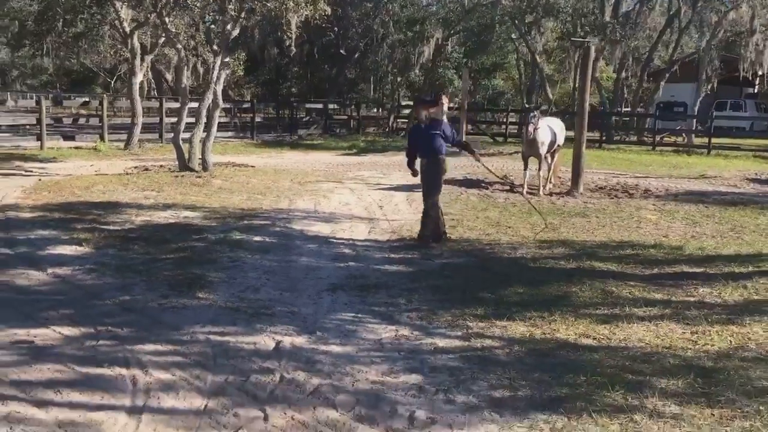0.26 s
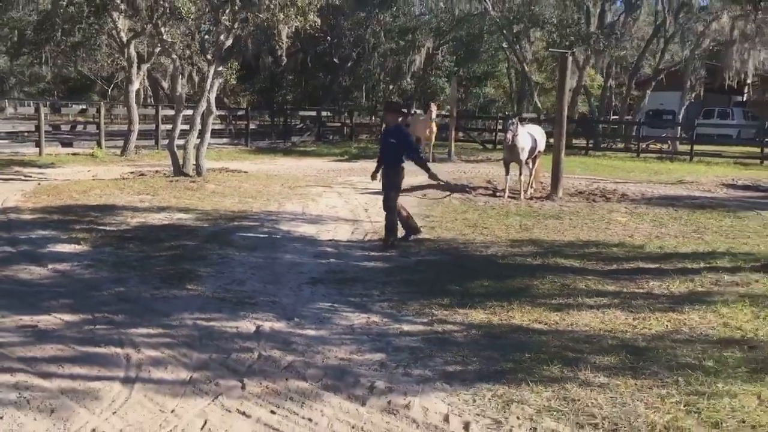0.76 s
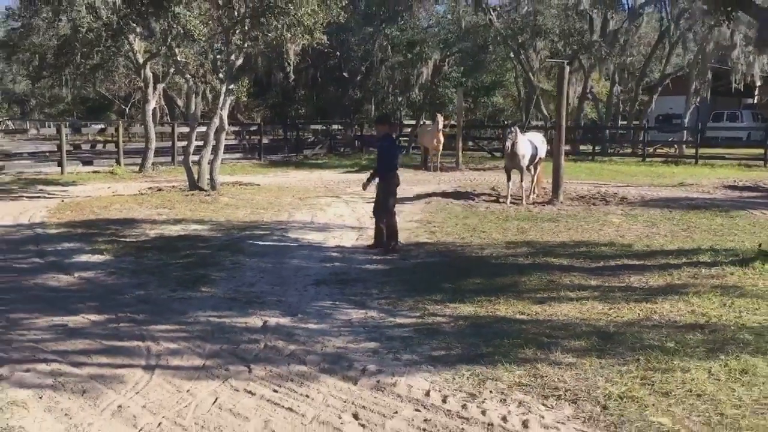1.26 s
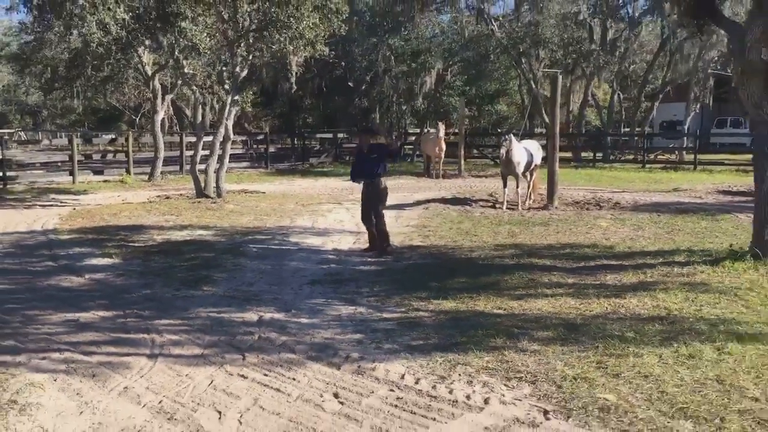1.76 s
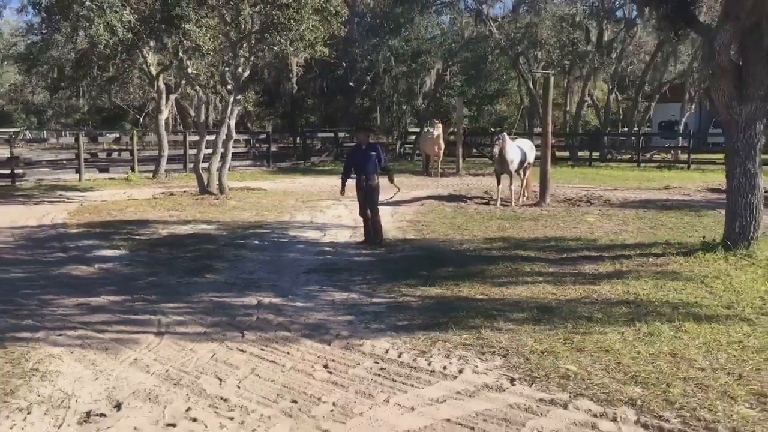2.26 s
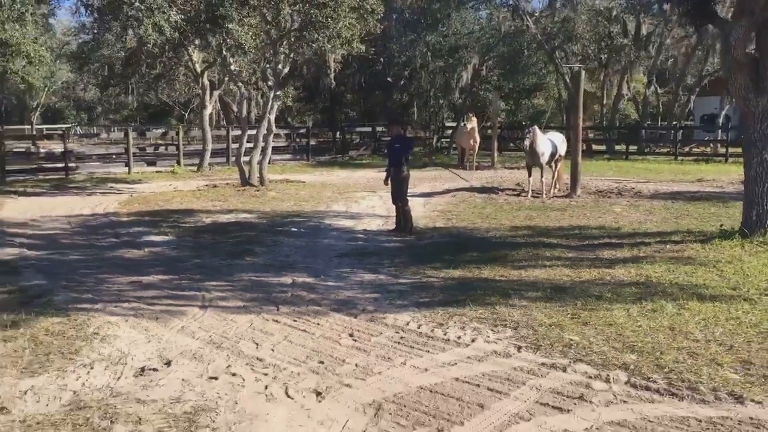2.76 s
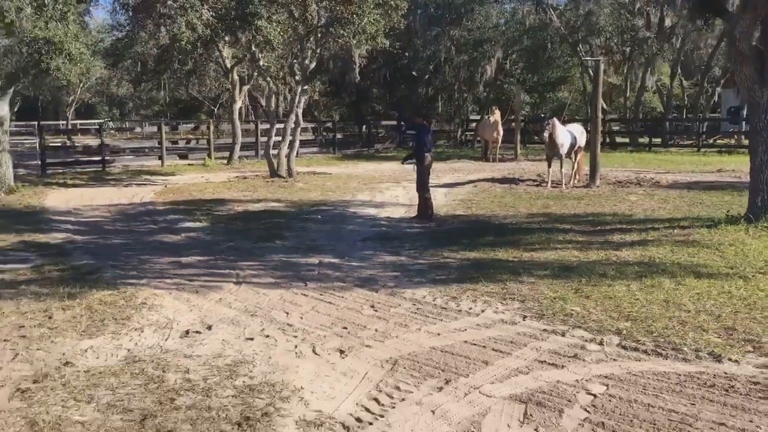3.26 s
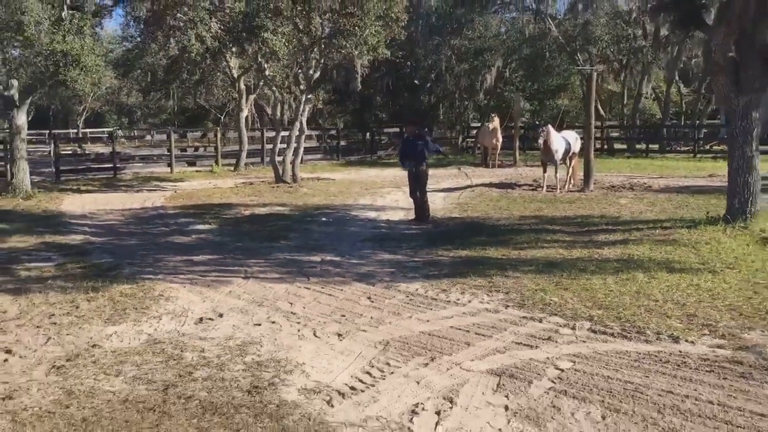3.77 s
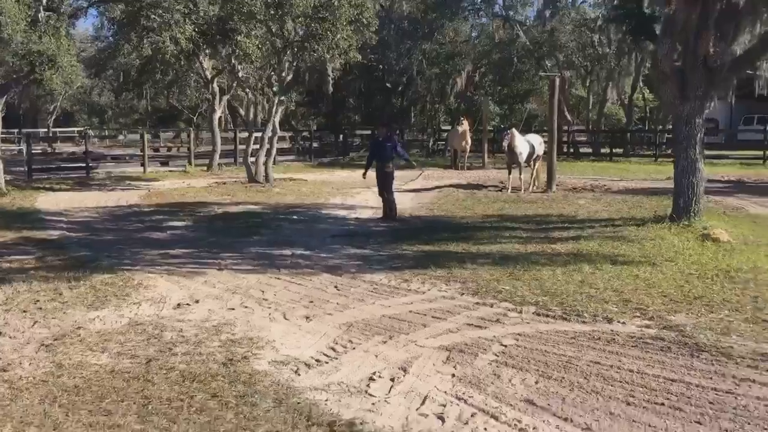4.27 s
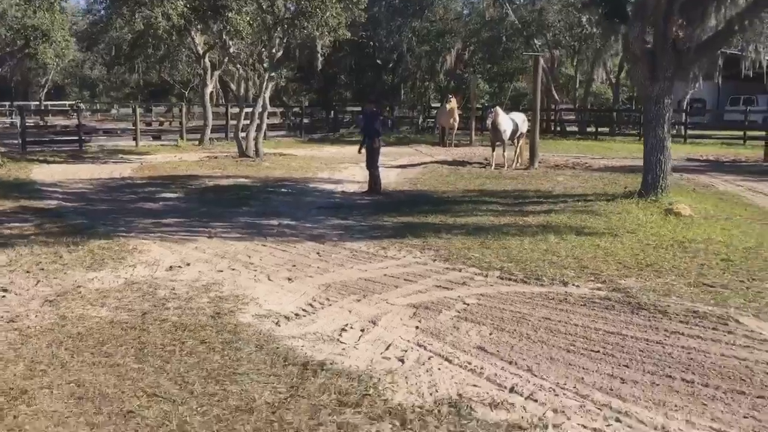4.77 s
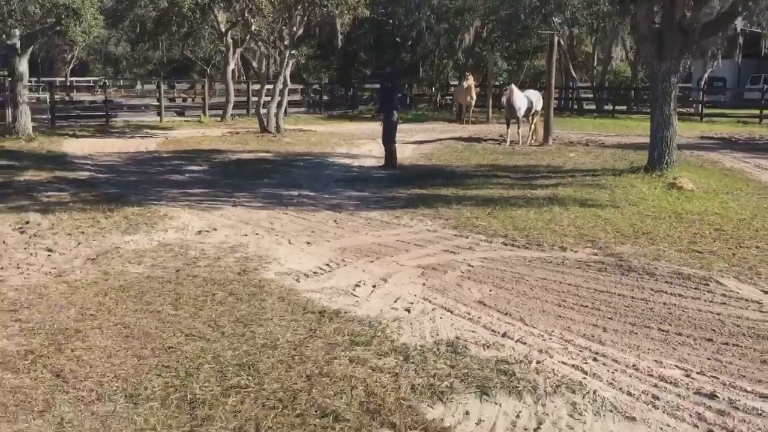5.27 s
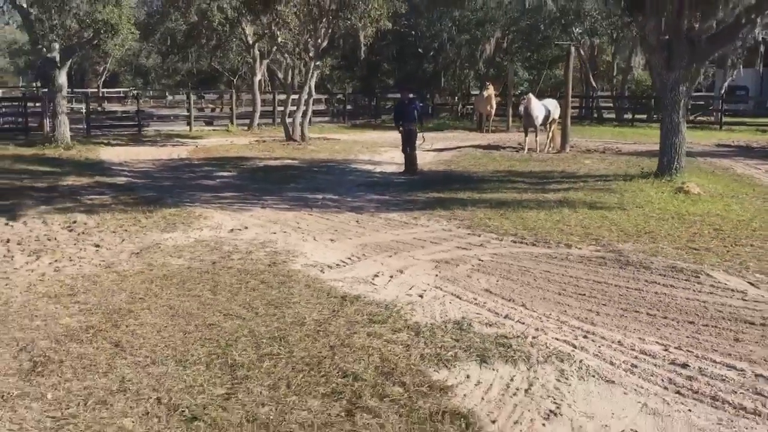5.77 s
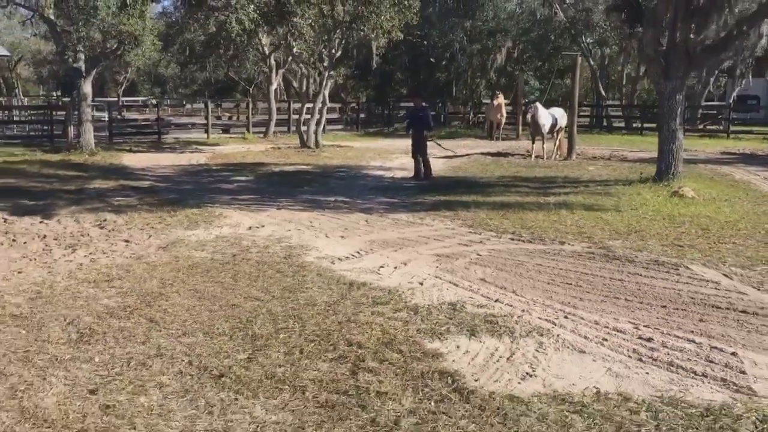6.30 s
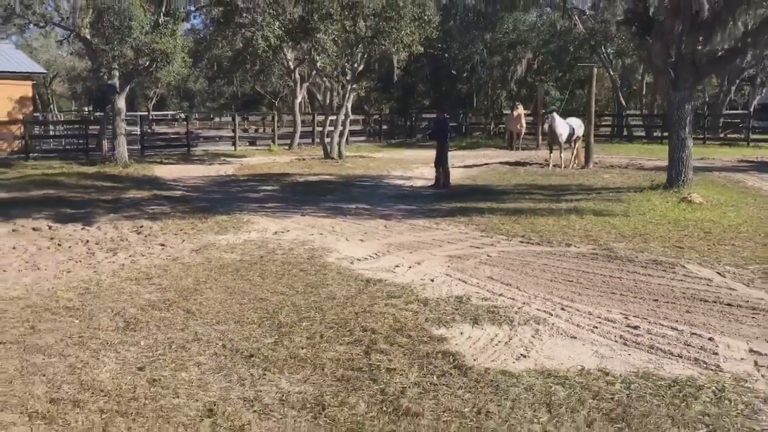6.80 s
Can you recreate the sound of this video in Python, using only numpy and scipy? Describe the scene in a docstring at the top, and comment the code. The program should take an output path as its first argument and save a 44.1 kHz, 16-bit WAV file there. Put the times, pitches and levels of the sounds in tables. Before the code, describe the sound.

Four sharp, loud whip cracks ring out one by one in an open yard, each slapped back by echoes and a hissing woodland tail.

```python
"""Open yard: a whip cracks four times close by; fences and sheds slap each crack back, woods hiss late.
Each crack is a swept-swing shock with ground bounce, shaped-noise whoosh and spray, and a low air slug.
Grainy noise makes steps on dry grass, leaves and scatter; dying sines make snaps, heels and a squeak.
A far engine idles as ringing knocks; wind noise rumbles; gain control ducks the yard after each crack."""
import sys
import numpy as np
from scipy import signal
from scipy.fft import rfft, irfft
from scipy.io import wavfile
from scipy.ndimage import uniform_filter1d

SR = 44100
rng = np.random.default_rng(int(sys.argv[2]) if len(sys.argv) > 2 else 0)


def log_audio(samples):
    """Write samples as a 16-bit WAV file to the path given in sys.argv[1]."""
    # one column per channel
    frames = np.atleast_2d(samples).T
    # limit to full scale, then quantise
    limited = np.clip(frames, -1, 1)
    pcm = np.round(limited * 32767).astype(np.int16)
    wavfile.write(sys.argv[1], SR, pcm)


N = 310464  # samples

# Spectra of the noises, each: pitch_hz, gain_db
WIND_SPECTRUM = [(13, -48), (22, -9), (53, 1), (107, 1.5), (233, -14.5), (300, -23), (390, -50.5),
                 (660, -120)]
YARD_SPECTRUM = [(150, -28), (300, -4.5), (380, -10.5), (560, -6.5), (750, -9), (1100, -14.5),
                 (1800, -28.5), (3000, -37.5), (6000, -53)]
LEAF_SPECTRUM = [(500, -32), (1000, 2.5), (1700, -3.5), (2600, -1), (3600, -19.5), (8000, -42)]
HISS_SPECTRUM = [(500, -25.5), (2500, 1), (7500, -3), (10300, -6.5), (14700, -1.5), (16000, -10)]  # microphone noise
STALK_SPECTRUM = [(1500, -18), (5000, -11), (9000, -3.5), (10300, -8), (12000, -2), (16000, -11)]
GRASS_SPECTRUM = [(760, -46), (1300, -3.5), (2800, 5.5), (4930, -5.5), (6760, -6), (10400, -14),
                  (14600, -9.5), (15700, -13), (16500, -45)]
NEAR_SPECTRUM = [(180, -38.5), (300, -24), (1120, -5), (1660, -9), (2840, -5), (4990, -13.5), (6300, -9),
                 (13800, -28), (16000, -35.5)]  # fences and near trunks
WOODS_SPECTRUM = [(250, -41), (500, -24.5), (650, -14), (850, -15), (1000, -7), (2200, 1), (3300, -5.5),
                  (4800, -13), (6400, -11.5), (9400, -22.5), (16000, -41.5)]
SPRAY_SPECTRUM = [(290, -35.5), (500, 0.5), (678, -4.5), (3020, 1), (4280, -13.5), (6330, -6.5),
                  (7640, -11), (11500, -11.5), (16000, -20)]  # frayed tip
WHOOSH_SPECTRUM = [(150, -17.0), (250, 0.5), (330, -7), (550, -2.5), (750, -8.5), (1200, -21.0), (2500, -33.5)]

# Background levels, each: time_s, level_db
WIND_LEVELS = [(0, -41.5), (.25, -49), (.7, -55.5), (1.1, -50), (1.85, -49), (2.3, -55.5), (3, -45),
               (3.75, -47.5), (4.15, -49.5), (4.55, -46), (5.07, -43.5), (5.25, -51), (5.55, -48.5),
               (6, -52), (6.9, -46), (7.04, -50)]
YARD_LEVELS = [(0, -58), (1.5, -60.5), (2.6, -56), (3.5, -56), (4.6, -57.5), (5.4, -56.5), (6.2, -58),
               (7.04, -65.5)]
LEAF_LEVELS = [(0, -65.5), (1, -61.5), (1.55, -64.5), (1.9, -72.5), (2.65, -57), (2.85, -69), (3.26, -62.5),
               (3.5, -82), (3.75, -64), (4.77, -63.5), (5.2, -66.5), (5.6, -64), (6.4, -79), (6.67, -61.5),
               (7.04, -65.5)]
HISS_DB = -71.5

# Engine cycles completed: time_s, count
ENGINE_CYCLES = [(0, -27), (2.7136, 0), (3.2259, 5), (3.7407, 10), (4.3643, 16), (4.7824, 20), (5.2029, 24),
                 (5.5202, 27), (7.1, 42)]
# Place of each cylinder in the cycle: share
CYLINDER_PLACES = [0, .322, .66]
# Knock strength: time_s, first_cylinder_db, second_cylinder_db
KNOCK_LEVELS = [(0, -53.5, -52.5), (2.3, -45, -56.5), (2.7, -37, -31.5), (2.93, -32, -32.5),
                (3.2, -37, -50.5), (3.6, -39.5, -47.5), (4.3, -33, -32.5), (4.8, -40, -37.5),
                (5.05, -54, -44), (5.3, -38, -34), (5.6, -43, -38.5), (6, -56.5, -60), (7.04, -53, -53)]
THIRD_CYLINDER_DB = -11  # against the second
# Engine block resonances: pitch_hz, width_hz, level_db
BLOCK_MODES = [(480, 810, -8), (711, 210, 4.5), (950, 160, -9.5), (1350, 730, -5.5)]

# Dry stalks bursting near the microphone: start_s, level_db, t60_s
CRACKLES = [(6.601, -52.5, 0.18), (6.655, -53, 0.037), (6.666, -44.5, 0.091)]
# Squeak: start_s, length_s, level_db, first_hz, last_hz
SQUEAK = (4.866, .075, -46, 1620, 740)
# Twigs and stalks snapping: start_s, level_db, pitch_hz, decay_cycles
SNAPS = [(1.069, -51, 2694, 8), (1.199, -57, 1230, 5.3), (1.248, -54, 1630, 17), (1.303, -45, 1880, 2.4),
         (1.398, -50, 1750, 4.1), (1.8043, -55, 2120, 2.3), (1.8364, -52, 1040, 3),
         (2.7283, -41.5, 2743, 6), (2.97, -46.5, 1870, 2.07), (3.635, -50.5, 1650, 1.3),
         (5.012, -41.5, 4970, 0.5), (5.195, -45, 1130, 1.9), (5.331, -47, 2810, 1.68),
         (6.593, -50.5, 1733, 4), (4.979, -52, 2400, 3.4), (6.691, -52, 2400, 6.5)]
# Heels: start_s, level_db, fall_hz (sets how far the thud falls towards 85 Hz)
HEELS = [(.9735, -33, 260), (1.038, -32, 170), (3.432, -33, 150), (6.592, -35, 110)]
# Footsteps: full_weight_s, attack_s, hold_s, release_s, level_db, bright_over_dull (half dB)
STEPS = [(0.097, .03, 0.081, 0.2, -54, 1), (0.735, .03, .01, .12, -53.5, 6.5),
         (1.108, 0.08, .01, 0.16, -55.5, 16), (1.233, 0.066, 0.045, .1, -62.5, 18),
         (1.624, 0.054, 0.0079, 0.12, -54.5, -41), (2.765, 0.086, 0.033, 0.07, -48, 6),
         (3.002, .03, 0.014, 0.052, -53, 5.5), (3.278, 0.058, 0.078, .08, -49.5, -1),
         (4.357, 0.266, 0.0144, 0.13, -47.5, 5.5), (4.82, .05, .005, 0.049, -49.5, -15),
         (4.874, .02, 0.0064, 0.075, -51.5, 10), (5.33, 0.0286, 0.018, 0.15, -49.5, 2),
         (6.419, .12, 0.032, .06, -48.5, 4), (6.89, 0.0336, 0.026, 0.19, -54, 5),
         (7.035, 0.014, .005, .02, -57.5, 12)]
STEP_EDGE_DB = -19.5  # at the far ends of attack and release

# First row: sharp spits in the spray just after the crack; other rows: surfaces slapping it back.
# swing_hz, smear_s, bass_edge_hz, arrivals (arrival_s, peak_db)
ECHOES = [(2600, .0006, 700, [(1.9683, -4.5), (1.9703, -6), (1.979, -14.5), (3.8016, -10), (3.806, -15),
          (5.607, -14)]), (2640, 0.0046, 900, [(.335, -12.5), (2.008, -12), (3.842, -13), (5.648, -22.5)]),
          (3350, 0.0046, 740, [(.362, -15), (2.0358, -7.5), (3.8672, -2), (5.6761, -5.5)]),
          (2980, 0.00066, 460, [(.3921, -7.5), (2.067, 1), (3.8992, 4), (5.707, -2.5)]),
          (2400, 0.00097, 1150, [(.4824, -20), (2.33, -28), (4.163, -20.5), (3.9749, -9), (5.7738, -10.5)])]
DULL_HZ_S = 896  # treble edge times delay: later arrivals are duller
# Woods decay: pitch_hz, t60_s
WOODS_T60 = [(500, 2.5), (1000, 1.88), (2000, 1.363), (4000, 1.27), (8000, 1.006), (14000, 0.75)]

# Tip snapping taut, crack by crack: level_db
TICK_LEVELS = [-19, -19.5, -23.5, -30]
TICK_LEAD_S = .023  # ahead of the shock
# Air shoved by the lash: slug_s, slug_db, end_pitch_hz, quick_extra_turns, flutter_db
BLASTS = [(.2841, -4, 52, .35, -5), (1.9612, -8.5, 48, .26, -12), (3.7942, -.5, 46, .39, -10),
          (5.6021, -2, 45, .4, -9.5)]
# Flutter: this many swings in the last stretch; exponent below 1 quickens it
FLUTTER_TURNS, FLUTTER_S, FLUTTER_EXPONENT = 1.25, .0062, .755
# Cracks: shock_s, shock_db, bounce_delay_s, bounce_db, whoosh_db, swish_db, swish_hz,
# spray_db, spray_end_s, near_scatter_db, woods_db
CRACKS = [(0.2792, -5, .0024, -5, -20, -17, 1480, -17, 0.026, -24, -27),
          (1.9562, -.5, .0018, -4, -26, -28.5, 1290, -15, 0.028, -21.5, -25),
          (3.7902, -.5, .0018, -4, -28, -30, 1280, -13, 0.021, -20, -20.5),
          (5.5978, -1.5, .0018, -14, -25, -31, 1360, -15, 0.027, -21.5, -22)]

EDGE_HZ = 16000  # top of the band


def amp(db):
    """Decibels to amplitude ratio."""
    return 10 ** (np.asarray(db) / 20)


def evened(x):
    """Scales to rms 1."""
    return x / np.sqrt(np.mean(x ** 2) + 1e-20)


def read(points, hz):
    """Reads a table of (pitch, value) on a log pitch axis."""
    f, value = np.transpose(points)
    return np.interp(np.log(hz + 1), np.log(f + 1), value)


def follow(levels):
    """Level in dB at every sample, from (time, level) points."""
    return np.interp(np.arange(N) / SR, *np.transpose(levels))


def add(mix, start_s, sound):
    """Mixes a sound in place, cut at the end of the mix."""
    part = mix[round(start_s * SR):][:len(sound)]
    part += sound[:len(part)]


def clock(length_s):
    """Sample times in seconds."""
    return np.arange(round(length_s * SR)) / SR


def colour(x, spectrum, tilt_db=0):
    """Filters x by a spectrum, tilted by tilt_db per octave about 4 kHz, to rms 1."""
    hz = np.fft.rfftfreq(len(x), 1 / SR)
    gain_db = read(spectrum, hz) + tilt_db * np.log2(hz / 4000 + 0.037)
    return evened(irfft(rfft(x) * amp(gain_db), len(x)))


def grains(count, spread_db):
    """Noise of uneven sample sizes: 0 dB is smooth hiss, more is crackle."""
    sign, chance = rng.standard_normal(count), rng.exponential(1, count)
    return sign * amp(spread_db * np.minimum(chance, 6))


def drift(count, cutoff_hz):
    """Low-passed noise at rms 1: slow chance wander."""
    lowpass = signal.butter(2, cutoff_hz, fs=SR, output="sos")
    return evened(signal.sosfilt(lowpass, rng.standard_normal(count)))


def hiss():
    """Microphone noise: steady coloured noise."""
    return amp(HISS_DB + 0.45 * drift(N, 4)) * colour(rng.standard_normal(N), HISS_SPECTRUM)


def yard_hush():
    """Hush of the yard: low-mid noise, wandering slightly."""
    return colour(grains(N, .7), YARD_SPECTRUM) * amp(follow(YARD_LEVELS) + 1.1 * drift(N, 9.5))


def leaves():
    """Stirring leaves: very grainy noise in uneven surges."""
    return colour(grains(N, 4.8), LEAF_SPECTRUM) * amp(follow(LEAF_LEVELS) + 3.3 * drift(N, 25))


def wind():
    """Wind on the microphone: lumpy bass noise."""
    return colour(rng.standard_normal(N), WIND_SPECTRUM) * amp(follow(WIND_LEVELS) + 2.03 * drift(N, 14))


def engine():
    """Each firing knocks the engine block, whose damped modes ring briefly."""
    time_s, done = np.transpose(ENGINE_CYCLES)
    out, t, whole = np.zeros(N), clock(.02), np.arange(done[0], done[-1])
    ring = 0
    for hz, width_hz, db in BLOCK_MODES:
        ring = ring + amp(db) * np.sin(2 * np.pi * hz * t) * np.exp(-np.pi * width_hz * t)
    ring = ring * (1 - np.exp(-(t / 0.00055) ** 2))  # distance rounds the edge
    level_s, first_db, second_db = np.transpose(KNOCK_LEVELS)
    levels_db = (first_db, second_db, second_db + THIRD_CYLINDER_DB)
    for place, cylinder_db in zip(CYLINDER_PLACES, levels_db):
        firings_s = np.interp(whole + place, done, time_s)
        for firing_s, luck in zip(firings_s, rng.standard_normal(len(whole))):
            knock_db = 1.1 * luck + np.interp(firing_s, level_s, cylinder_db)
            add(out, firing_s, -amp(knock_db) * ring)
    return out


def crackle(start_s, db, t60_s):
    """A stalk bursts: bright grainy noise, dying at once."""
    t = clock(.08)
    return start_s, amp(db - 60 * t / t60_s) * colour(grains(len(t), 1.9), STALK_SPECTRUM)


def squeak(start_s, length_s, db, first_hz, last_hz):
    """A short, rough, falling squeak with a weak overtone."""
    t = clock(length_s)
    glide_hz = first_hz * (last_hz / first_hz) ** (t / length_s)
    rough_hz = glide_hz * (1 + 0.0733 * drift(len(t), 260))
    phase = 2 * np.pi * np.cumsum(rough_hz) / SR
    throb = 1 + 0.4 * np.cos(2 * np.pi * 50 * (t - .014))  # it slips and catches
    shape = np.minimum(t / 0.0068, 1) * amp(-16 * (t / length_s) ** 5.1)
    return start_s, amp(db) * shape * throb * (np.sin(phase) + 0.296 * np.sin(2 * phase))


def snap(start_s, db, hz, cycles):
    """A twig snaps: a sine decaying to 1/e in the given cycles."""
    t = clock(.05)
    return start_s, amp(db) * np.sin(2 * np.pi * hz * t) * np.exp(-t * hz / cycles) * 2.1


def heel(start_s, db, fall_hz):
    """A heel lands: a dying swing whose pitch sags towards 85 Hz."""
    t = clock(.05)
    turns = 85 * t + (fall_hz - 85) * 0.0058 * (1 - np.exp(-t / 0.0039))
    return start_s, -amp(db) * 1.25 * np.sin(2 * np.pi * turns) * np.exp(-t / 0.0076)


def step(full_s, attack_s, hold_s, release_s, db, brightness):
    """Dry grass crushed under a sole: dense crackle that swells, holds and fades."""
    lead_s = .4
    t = clock(.8) - lead_s
    away = np.maximum(-t / attack_s, 0) + np.maximum((t - hold_s) / release_s, 0)
    dull = colour(grains(len(t), 3.), GRASS_SPECTRUM, -2.)
    bright = colour(grains(len(t), 3.), GRASS_SPECTRUM, 2.)
    bright_share = 1 / (1 + amp(-brightness))  # of power
    blend = np.sqrt(1 - bright_share) * dull + np.sqrt(bright_share) * bright
    sound = amp(db + STEP_EDGE_DB * away ** 1.022) * blend
    cut = max(round((lead_s - full_s) * SR), 0)  # part before time zero
    return max(full_s - lead_s, 0), sound[cut:]


def woods():
    """Scatter from the tree line swells in late, trunk by trunk; the treble dies first."""
    t = clock(1.9)
    sparse = rng.random(len(t)) < 700 / SR  # about 700 per second
    trunks = grains(len(t), 0.95) + 2.8 * grains(len(t), 2.5) * sparse
    hz, frame_s, z = signal.stft(colour(trunks, WOODS_SPECTRUM), SR, nperseg=256)
    patches = uniform_filter1d(rng.standard_normal(z.shape), size=5, axis=0)
    patches_db = 2.05 * evened(uniform_filter1d(patches, size=8, axis=1))
    decay_db = -60 * frame_s / read(WOODS_T60, hz)[:, None]
    tail = signal.istft(z * amp(patches_db + decay_db), SR, nperseg=256)[1][:len(t)]
    return tail / (1 + np.exp((.12 - t) / .035))


def echo(arrival_s, db, swing_hz, smear_s, bass_hz):
    """A spit or slap: the shock again, clean or smeared into a burst, without bass, duller when later."""
    t = clock(.02)
    delay_s = min(arrival_s - row[0] for row in CRACKS if row[0] < arrival_s)
    smear = np.exp(-(t / max(smear_s, 1e-4)) ** 2) + .06 * np.exp(-t / .004)
    response = .3 * grains(len(t), 1.5) * smear + (t == 0)
    highpass = signal.butter(4, bass_hz, "high", fs=SR, output="sos")
    sound = signal.sosfilt(highpass, np.convolve(response, shock(swing_hz, 1.0)))
    sound = signal.lfilter(*signal.iirnotch(4900, 4, SR), sound)  # microphone colour: a dip near 4.9 kHz
    treble_edge_hz = min(DULL_HZ_S / delay_s, .45 * SR)
    sound = signal.lfilter(*signal.butter(2, treble_edge_hz, fs=SR), sound)
    return arrival_s, amp(db) * sound / abs(sound).max()


def tick(start_s, db):
    """The tip snaps taut: a small shock and a wisp of hiss."""
    t = clock(.03)
    out = amp(-17.0) * grains(len(t), 1.9) * np.exp(-t / 0.011)
    add(out, 0, shock(2400))
    return start_s, amp(db) * out


def blast(slug_s, slug_db, end_hz, extra_turns, flutter_db):
    """The passing loop flutters the air ever faster, then a pressure slug hits and sags in pitch."""
    lead_s = .03
    t = clock(.09) - lead_s
    after, before = np.maximum(t, 0), np.maximum(-t, 0)
    turns = end_hz * after + extra_turns * (1 - np.exp(-after / .003))
    slug = -amp(slug_db) * np.sin(2 * np.pi * turns) * np.exp(-(after / 0.023) ** 2.54)
    swings = FLUTTER_TURNS * (before / FLUTTER_S) ** FLUTTER_EXPONENT
    flutter = np.sin(2 * np.pi * swings) * np.exp(-(before / 0.014) ** 2)
    build_up = .75 * np.exp(-((before - .0032) / .0016) ** 2)  # pressure piles up ahead of the slug
    return slug_s - lead_s, slug + amp(flutter_db) * (flutter + build_up)


def shock(swing_hz, spike=0.16):
    """Sonic boom: a thin spike, a quickly dying swing that widens, and a brief bright ring."""
    t = clock(.003)
    swing = -np.sin(2 * np.pi * (swing_hz * t) ** .63) * np.exp(-(t * swing_hz / 1.6) ** 2)
    bright = 0.18 * np.sin(2 * np.pi * 6500 * t) * np.exp(-t / 0.00049)
    return swing + bright + spike * (1 - t / .00006) * np.exp(-t / .00006)


def crack(shock_s, shock_db, bounce_s, bounce_db, whoosh_db, swish_db, swish_hz,
          spray_db, spray_end_s, near_db, woods_db):
    """Whoosh and whistling swish of the loop, shock with its ground bounce, tip spray, then scatter."""
    out, t, lead_s = np.zeros(2 * SR), clock(.1), .016
    whoosh = colour(grains(len(t), 0.94), WHOOSH_SPECTRUM)
    add(out, 0, amp(whoosh_db) * whoosh * np.exp(-((t - .016) / 0.013) ** 2))

    swish_spectrum = [(500, -22), (swish_hz * 0.84, -8), (swish_hz, 0), (swish_hz * 1.08, -10),
                      (3000, -20), (6000, -30), (16000, -36)]
    swish = colour(grains(len(t), 1.), swish_spectrum)
    # the loop passes twice
    surges = np.exp(-((t - .006) / 0.0036) ** 2) + 1.55 * np.exp(-((t - .013) / 0.0031) ** 2)
    add(out, 0, amp(swish_db) * swish * surges)

    add(out, lead_s, amp(shock_db) * shock(2100))
    add(out, lead_s + bounce_s, amp(bounce_db) * shock(1295, .2))

    dip = 1 - .85 * np.exp(-((t - .0045) / .003) ** 4)
    spray_shape = dip / (1 + np.exp((t - spray_end_s) / .002))
    spray = colour(grains(len(t), 1.2), SPRAY_SPECTRUM)
    add(out, lead_s, amp(spray_db - 60 * t) * spray_shape * spray)

    t = clock(0.94)
    waver_db = 2.2 * drift(len(t), 90)  # scatter level wavers by chance
    near = colour(grains(len(t), 0.89), NEAR_SPECTRUM) / (1 + np.exp((.009 - t) / 0.0014))
    add(out, lead_s, amp(near_db - 60 * t / 0.64 + waver_db) * near)
    add(out, lead_s, amp(woods_db) * woods())
    return shock_s - lead_s, out


def scene():
    """The yard's steady sounds, then every event at its time."""
    mix = hiss() + yard_hush() + leaves() + wind() + engine()
    sources = ((crackle, CRACKLES), (squeak, [SQUEAK]), (snap, SNAPS), (heel, HEELS), (step, STEPS),
               (blast, BLASTS), (crack, CRACKS))
    for source, table in sources:
        for row in table:
            add(mix, *source(*row))
    for swing_hz, smear_s, bass_hz, arrivals in ECHOES:
        for arrival_s, db in arrivals:
            add(mix, *echo(arrival_s, db, swing_hz, smear_s, bass_hz))
    for row, db in zip(CRACKS, TICK_LEVELS):
        add(mix, *tick(row[0] - TICK_LEAD_S, db))
    return mix[None]


def record(dry):
    """Gain control lags a little, ducks after each crack and creeps back; soft ceiling; band limit."""
    dry = signal.sosfiltfilt(signal.butter(2, 27, "high", fs=SR, output="sos"), dry)
    power = signal.lfilter(np.ones(900) / 900, 1, dry[0] ** 2)
    power_db = 10 * np.log10(abs(power) + 1e-12)
    sink_db = np.arange(N) * 37.0 / SR  # the held level sinks 37 dB/s
    held_db = np.maximum.accumulate(power_db + sink_db) - sink_db
    over_db = np.maximum(held_db + 39.0, 0)  # threshold -39 dB
    lagged_db = signal.lfilter([1 / 1200], [1, 1 / 1200 - 1], over_db)  # 1200 samples
    ducked = dry / amp(0.29 * lagged_db)
    limited = ducked / (1 + abs(ducked) ** 6) ** (1 / 6)  # knee just under full scale
    lowpass = signal.firwin(511, EDGE_HZ, window=("kaiser", 9), fs=SR)
    return signal.oaconvolve(limited, lowpass[None], "same")


dry = scene()
out = record(dry)
log_audio(out)
```